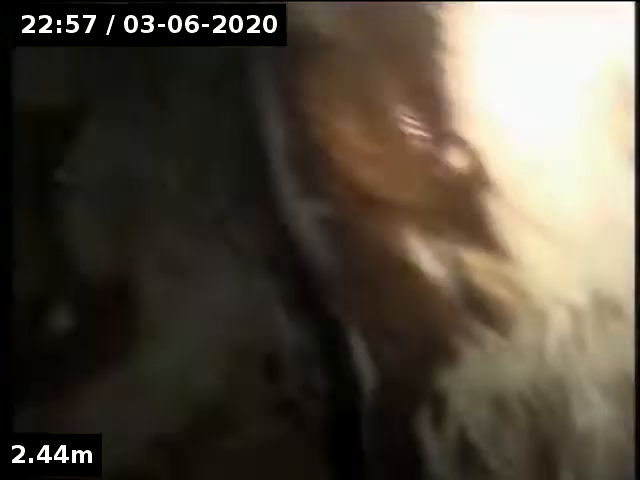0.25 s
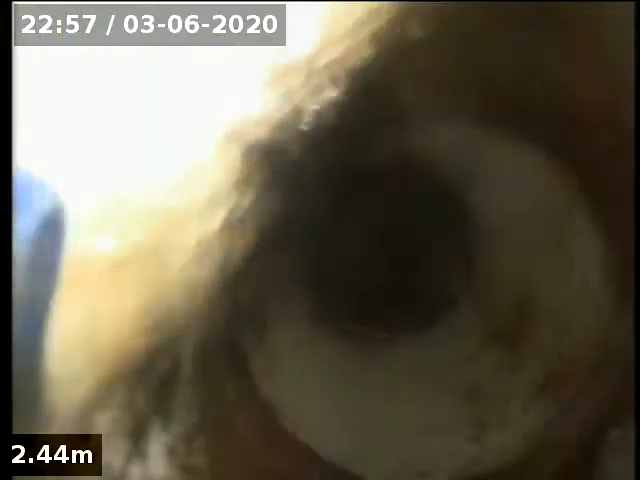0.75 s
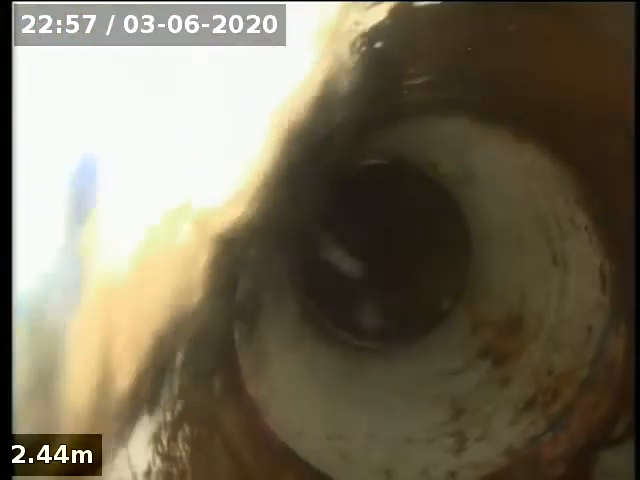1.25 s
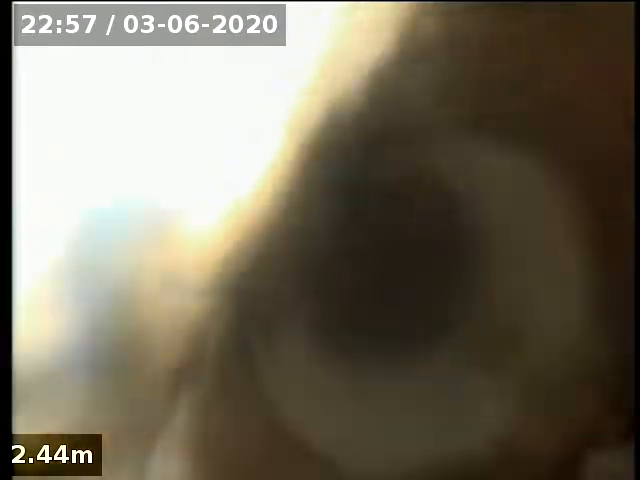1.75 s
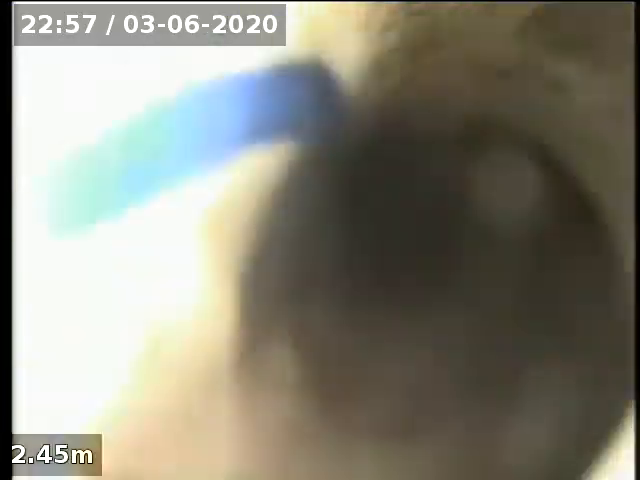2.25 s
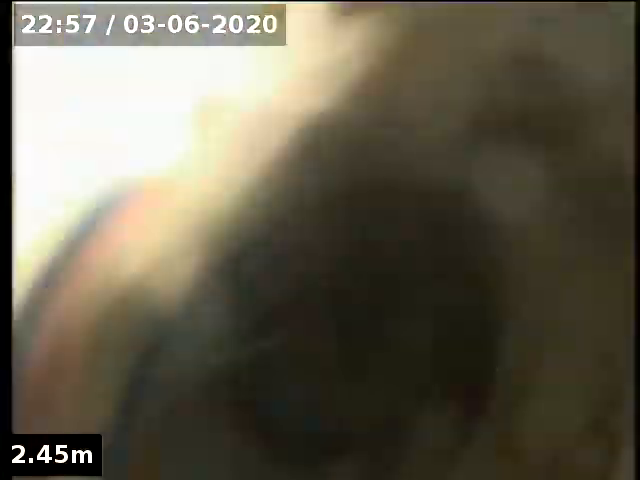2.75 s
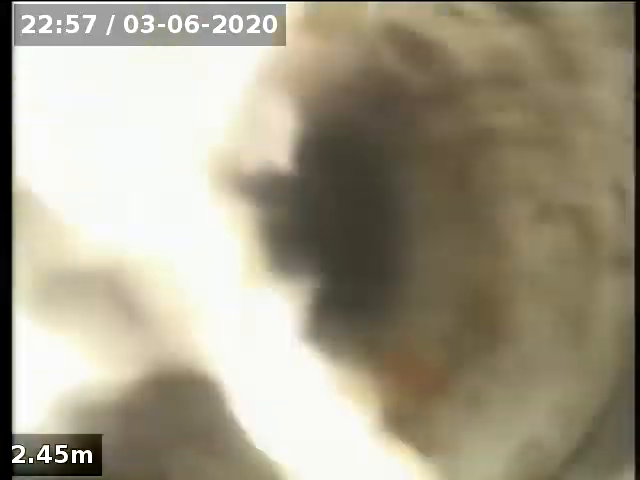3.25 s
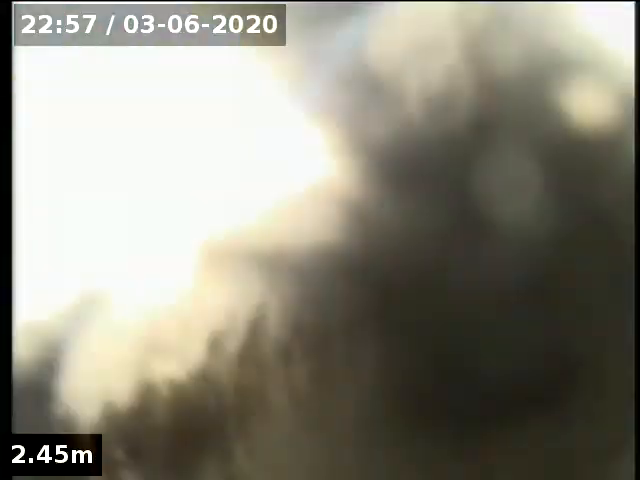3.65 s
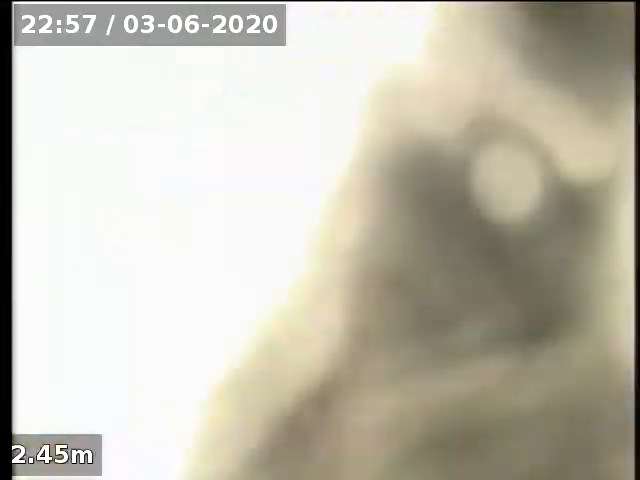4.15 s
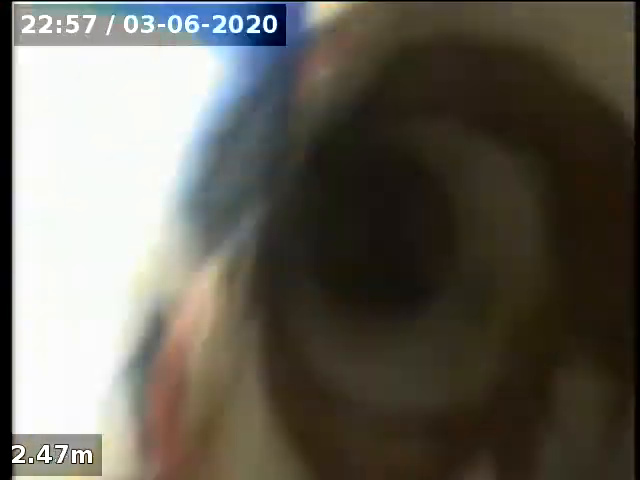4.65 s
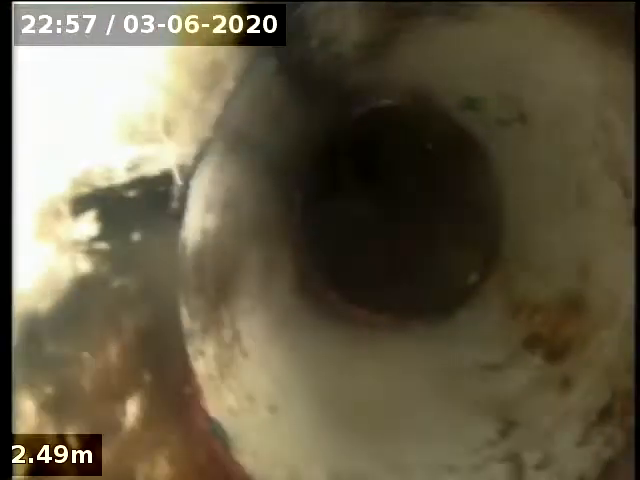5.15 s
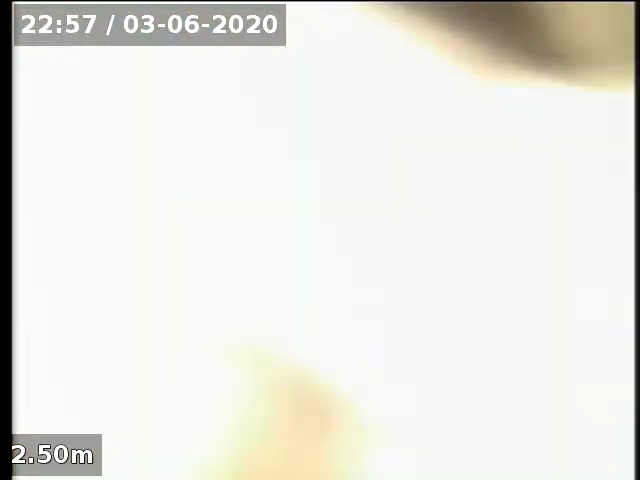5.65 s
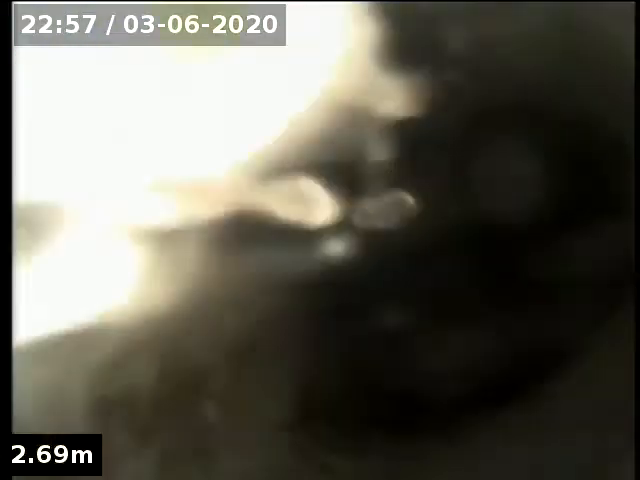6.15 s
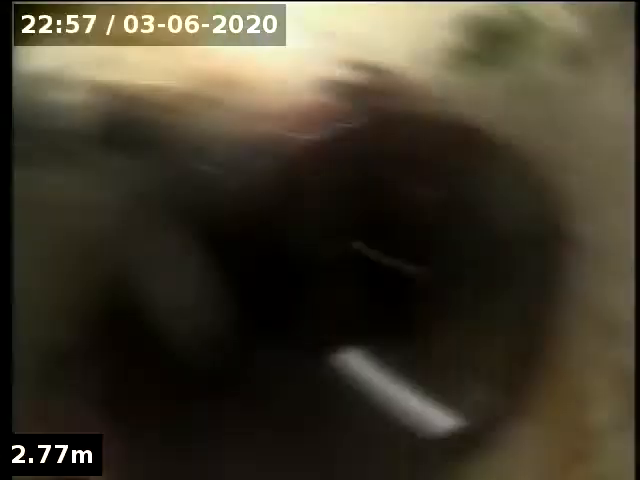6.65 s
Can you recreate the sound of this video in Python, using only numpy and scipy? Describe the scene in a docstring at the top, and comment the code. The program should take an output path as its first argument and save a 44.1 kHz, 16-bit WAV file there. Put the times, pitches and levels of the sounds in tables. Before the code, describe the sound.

Hard hollow clacks and gritty scraping come in uneven clusters as a push rod is worked along a pipe, heard close on a cheap microphone.

```python
"""A faint scrape comes first, then hard slaps in bursts: a stiff push rod is fed into a drain pipe
close beside a small recorder. Grit under the rod drives the pipe, stick and slip makes it squeal,
and each slap is a rattle of contacts that pipe and room answer. Soft hiss and hum lie behind.
The cheap microphone has a deep notch, overloads lopsidedly, and the sound drops out once."""
import sys
import numpy as np
from scipy import signal
from scipy.io import wavfile

SR = 44100
rng = np.random.default_rng(int(sys.argv[2]) if len(sys.argv) > 2 else 0)


def dump_mix(stems):
    """Bounce the given channels to the path in sys.argv[1] as a 16-bit WAV at rate SR."""
    frames = np.atleast_2d(stems).T  # one column per channel
    limited = np.clip(frames, -1, 1)  # hard clip at full scale
    pcm = np.round(limited * 32767).astype(np.int16)
    wavfile.write(sys.argv[1], SR, pcm)


N = 304290


def gain_of(db):
    """Turns decibels into an amplitude factor."""
    return 10 ** (np.asarray(db) / 20)


def evened(x):
    """Scales to rms 1."""
    return x / np.sqrt(np.mean(x ** 2) + 1e-20)


def peaked(x):
    """Scales to peak 1."""
    return x / np.abs(x).max()


def read(points, hz):
    """Reads a table of (f, value) on a log-frequency axis."""
    f, value = np.transpose(points)
    return np.interp(np.log(hz + 1), np.log(f + 1), value)


def coloured(x, points):
    """Causal minimum-phase filter with the gain curve given in dB."""
    hz = abs(np.fft.fftfreq(8192, 1 / SR))
    log_gain = np.log(gain_of(read(points, hz)))
    spectrum = np.exp(np.conj(signal.hilbert(log_gain)))
    taps = np.fft.ifft(spectrum).real[:4096]
    return signal.oaconvolve(x, taps)[:N]


def resonate(x, hz, width_hz):
    """Resonance of gain 1 at a fixed or moving pitch: shifts it to zero, smooths, shifts back."""
    turn = np.exp(2j * np.pi * np.cumsum(hz * np.ones(len(x))) / SR)
    r = np.exp(-np.pi * width_hz / SR)
    smoothed = signal.lfilter([1 - r], [1, -r], x / turn + 1e-18)
    return 2 * (turn * smoothed).real


def band(x, low_hz, high_hz):
    """Butterworth band-pass."""
    sos = signal.butter(2, [low_hz, high_hz], "bandpass", fs=SR, output="sos")
    return signal.sosfilt(sos, x)


def wander(per_s):
    """Chance curve of rms 1, with straight lines between per_s knots a second."""
    knots = np.arange(0, N / SR + 1, 1 / per_s)
    return evened(np.interp(np.arange(N) / SR, knots, rng.standard_normal(len(knots))))


def pipe(x):
    """Pipe and rod answer a drive with a sum of decaying modes."""
    # modes of pipe and rod: (f/Hz, level/dB relative to one another, t60/s)
    modes = [(240, -14.5, 0.11), (305, -2, 0.15), (380, -8.5, 0.27), (434, -5.5, 0.18),
             (526.2, -11.5, 0.24), (630, -5.5, 0.05), (702.3, 1.5, 0.071), (1060, -8.5, 0.23),
             (1132, -4.5, 0.18), (1250, 0, 0.062), (1520, -1, 0.007), (1620, 7, 0.025), (2050, -9.5, 0.18),
             (2340, 6, 0.011), (2810, -7, 0.095), (3100, 7.5, 0.011), (4720, 5, 0.0091),
             (6450, -2.5, 0.019)]
    t = np.arange(SR // 4) / SR
    ring = sum(gain_of(db - 60 * t / t60) * np.sin(2 * np.pi * hz * t) for hz, db, t60 in modes)
    return signal.oaconvolve(x, ring / np.linalg.norm(ring))[:N]


def room(paths):
    """Echoes off the room: a tail of sparse taps for each path, each band dying at its own speed."""
    # decay time of the room: (f/Hz, t60/s)
    decay = [(100, 0.12), (300, 0.2), (700, 0.31), (1800, 0.16), (4800, .2), (8000, 0.13)]
    taps = np.zeros((len(paths), SR // 2))
    at = np.arange(200, SR // 2 - 20, 20)
    at = at + rng.integers(0, 20, (len(paths), len(at)))  # one tap somewhere in every 20 samples
    np.put_along_axis(taps, at, rng.choice([-1., 1.], at.shape), 1)
    hz, t, z = signal.stft(taps, SR, nperseg=256)
    fade = gain_of(-60 * t / read(decay, hz)[:, None])
    tail = signal.istft(z * fade, SR, nperseg=256)[1]
    tail /= np.linalg.norm(tail, axis=1, keepdims=True)
    return signal.fftconvolve(paths, tail, axes=1)[:, :N].sum(0)


def air():
    """Still air and amplifier hiss are coloured noise; the faint wavering hum is narrow noise."""
    # level of the hiss, about which it wanders: (t/s, level/dB)
    hiss_level = [(0, -62.5), (.8, -60), (1.1, -62.5), (1.33, -63), (1.45, -60.5), (1.6, -62), (1.7, -61.5),
                  (5, -61.5), (5.2, -61), (6.9, -65)]
    # spectrum of the hiss, relative: (f/Hz, level/dB per Hz)
    hiss_colour = [(20, -16.5), (60, -4.5), (150, 0), (500, -2), (1000, -3.5), (2000, -9), (3200, -15.5),
                   (4600, -16.5), (6500, -6), (8400, -16)]
    # wavering tones: (f/Hz, level/dB)
    hum_tones = [(100.9, -81), (195.4, -82.5)]
    t = np.arange(N) / SR
    level_db = np.interp(t, *np.transpose(hiss_level)) + 0.97 * wander(24.0)
    noise = evened(coloured(rng.standard_normal(N), hiss_colour)) * gain_of(level_db)
    hum = sum(gain_of(db) * evened(resonate(rng.standard_normal(N), hz, 2.9)) for hz, db in hum_tones)
    return noise + hum


def squeals():
    """The rod squeals as it rubs: quick stick and slip holds one mode of it for a moment."""
    # squeals: (t/s, level/dB before the swell and its halving, first f/Hz, last f/Hz, length/s)
    squeal_rows = [(0.066, -44.5, 1140, 1200, 0.2), (0.447, -34.5, 1300, 1190, 0.018),
                   (2.6, -40, 1620, 1527, 0.08), (2.628, -41, 1165, 1060, .08),
                   (2.987, -33.5, 1484, 1390, 0.028), (3.157, -38, 1310, 1280, 0.024),
                   (3.812, -41, 1500, 1600, 0.075), (4.436, -40.5, 1120, 1250, 0.18),
                   (4.45, -40, 1630, 1760, 0.02), (5.689, -31, 1320, 1290, 0.013),
                   (5.764, -28, 1280, 1230, 0.019), (5.786, -23, 1360, 1320, 0.023),
                   (5.922, -25, 1360, 1350, 0.022), (6.237, -30, 1090, 1090, 0.023),
                   (6.334, -34.5, 1330, 1370, 0.05), (6.742, -39, 1020, 950, 0.051)]
    out = np.zeros(N)
    shakes = rng.standard_normal((len(squeal_rows), SR // 5))
    for shake, (s, db, first_hz, last_hz, length) in zip(shakes, squeal_rows):
        u = np.arange(round(length * SR)) / (length * SR)
        hz = first_hz + (last_hz - first_hz) * u
        tone = resonate(resonate(shake[:len(u)], hz, 170.), hz, 170.)
        swell = np.sin(np.pi * u ** 0.36) / 2  # quick rise, slow fall
        at = round(s * SR)
        out[at:at + len(u)] += gain_of(db) * evened(tone) * swell
    return out + gain_of(-12) * room(out[None])


def squeaks(grit, low_hz, high_hz, cycles):
    """Each grain of grit rings for a few cycles at one of 16 pitches."""
    which, t, out = rng.integers(0, 16, N), np.arange(1500) / SR, np.zeros(N)
    for k, hz in enumerate(np.geomspace(low_hz, high_hz, 16)):
        grain = np.sin(2 * np.pi * hz * t) * np.exp(-t * hz / cycles)
        rung = signal.oaconvolve(grit * (which == k), grain / np.linalg.norm(grain))[:N]
        out += gain_of(3.4 * wander(30.)) * rung
    return evened(out)


def scrape():
    """Grit catches and slips in uneven clumps under the rod and drives the pipe."""
    # level of the low rumble, about which it wanders: (t/s, level/dB)
    rumble_level = [(0, -67), (.17, -46), (.35, -55), (.6, -62), (.8, -74), (1.72, -84.5), (1.8, -60.5),
                    (1.98, -46.5), (2.1, -58.5), (2.5, -62), (2.72, -45.5), (3.2, -63.5), (3.39, -40.5),
                    (3.55, -63), (3.83, -49.5), (4.01, -37), (4.1, -50), (4.31, -54), (4.6, -49),
                    (4.76, -52), (4.95, -59.5), (5.1, -73.5), (5.5, -62.5), (5.87, -42), (6.2, -49),
                    (6.5, -51.5), (6.62, -54), (6.9, -46)]
    # rod sliding on the wall, one curve per spell of pushing: (t/s, level/dB without its hiss)
    slide_spells = [
        [(0.0, -79), (.11, -45.5), (.208, -33.5), (.26, -62), (.324, -48), (.36, -53), (.508, -44.5), (.6, -67),
         (.676, -58), (.8, -79)],
        [(1.73, -74), (1.892, -45.5), (1.98, -40.5), (2.078, -68), (2.232, -72), (2.348, -49.5), (2.42, -48),
         (2.51, -54), (2.56, -46), (2.646, -39), (2.718, -46.5), (2.83, -53)],
        [(2.93, -40), (2.97, -49), (3.08, -39), (3.18, -64), (3.29, -36.5), (3.34, -62), (3.51, -49),
         (3.56, -59), (3.67, -47), (3.8, -49), (3.86, -41), (3.92, -64), (4.01, -41), (4.12, -62.5),
         (4.24, -34), (4.31, -64.5), (4.43, -59.5), (4.61, -41), (4.68, -50), (4.79, -47.5), (4.95, -60.5)],
        [(5.28, -68), (5.454, -57), (5.5, -72), (5.722, -46.5), (5.82, -51), (5.97, -46.5), (6.11, -47.5),
         (6.182, -44), (6.254, -46), (6.438, -64), (6.5, -66), (6.62, -69), (6.768, -43.5), (6.818, -50),
         (6.9, -53)],
    ]
    # brief light brushes: (t/s, length/s, peak level/dB, brightest f/Hz, hiss level/dB relative to it)
    brush_rows = [(1.358, 0.31, -66.5, 2500, 3), (1.801, 0.067, -47, 1600, -15),
                  (2.033, 0.026, -50, 1520, -9), (2.154, 0.049, -41, 1530, -14),
                  (5.36, 0.11, -50, 2220, -6)]
    bright_hz, bright_drift = 1500, 0.16  # brightest band, rms of its drift as a share
    slide_hiss_db = -7  # relative to the scrape
    t, out = np.arange(N) / SR, np.zeros(N)

    # about 4000 catches a second, a few of them much harder
    force = gain_of(2.8 * np.minimum(rng.exponential(1, N), 5))
    grit = force * (rng.random(N) < 4000. / SR) * rng.choice([-1., 1.], N)
    grit = grit * gain_of(2.7 * wander(60.))
    rung = evened(pipe(grit))

    low = rung + 0.57 * evened(band(grit, 170.0, 640.0))
    rumble = evened(band(low, 150., 1300.0)) * gain_of(4.2 * wander(25.))
    hiss = evened(evened(band(grit, 3700.0, 7800.0)) + 0.95 * evened(band(rung, 3700.0, 7900.)))
    crunch = evened(band(rung, 1100.0, 3500.)) + squeaks(grit, 800., 3200., 3.3)
    drifting_hz = bright_hz * (1 + bright_drift * wander(10.0))
    bright = resonate(band(grit, 670.0, 3500.), drifting_hz, 280.0)
    slide = evened(crunch + 0.38 * evened(bright)) + gain_of(slide_hiss_db) * hiss

    out += gain_of(np.interp(t, *np.transpose(rumble_level))) * rumble
    for rows in slide_spells:
        s, db = np.transpose(rows)
        touching = np.clip(np.minimum(t - s[0], s[-1] - t) / 0.0071, 0, 1)  # 7.1 ms fades
        out += touching * gain_of(np.interp(t, s, db)) * slide
    for s, length, db, hz, hiss_db in brush_rows:
        stroke = np.sqrt(np.sin(np.pi * np.clip((t - s) / length, 0, 1)).clip(0))
        body = evened(crunch + 2.0 * evened(resonate(grit, hz, 700.)))
        out += stroke * gain_of(db) * (body + gain_of(hiss_db) * hiss)
    return out + gain_of(-19.0) * room(out[None])


def slaps():
    """Each slap is a brief rattle of contacts: a crack, a tick and a thud, then pipe and room ring."""
    # slaps of the rod: (t/s, blow level/dB, crack f/Hz, rattle length/s, tick level/dB, thud f/Hz,
    # thud level/dB, ring level/dB); the last three levels are relative to the blow
    slap_rows = [(.213, -24.5, 2050, 0.0082, -4.5, 506, -15, -12.5),
                 (.237, -2.5, 2300, 0.0048, -7.5, 103, -20.5, -13.5),
                 (.246, -10.5, 2140, 0.0053, -21, 236, -20.5, -11.5),
                 (.336, -34, 2310, 0.0045, -28, 320, -8, -6.5),
                 (.383, -5.5, 1140, 0.002, -50, 697, -22, -25),
                 (.455, -29, 1220, .0033, -25, 380, -28, -20),
                 (.541, -33, 1280, .0046, -22, 259, -7.5, -13.5),
                 (.573, -27.5, 1380, 0.0058, -36, 695, -30, -11),
                 (.619, -45.5, 1100, 0.0034, -19, 203, -9, -10), (.658, -43, 900, 0.0032, 0, 385, -29, 1),
                 (.719, -12, 1700, 0.0035, -11.5, 111.3, -23.5, -20),
                 (1.742, -40, 2250, 0.0036, -24.5, 252, -25.5, -23),
                 (1.805, -33.5, 1580, .0017, -25, 444, -20.5, -1),
                 (2.107, -39.5, 2130, 0.0037, -7, 390, -19, -2.5),
                 (2.186, -19, 2080, 0.0016, -25, 370, -28, -13),
                 (2.272, -5.5, 2200, 0.0045, -13, 127, -21.5, -17.5),
                 (2.461, -20.5, 1610, 0.0035, -39, 325, -20, -12.5),
                 (2.534, -34.5, 1950, .0024, -26, 667, -24, 4.5),
                 (2.556, -29, 1560, 0.0027, -16, 283, -34, -13),
                 (2.662, -26, 1510, 0.0034, -20, 316, -16, -20), (2.675, -25, 950, 0.002, -3, 549, -16, 0),
                 (2.74, -16, 1590, 0.0056, -38, 312, -15, -13),
                 (2.796, -20, 1410, 0.0033, -23, 445, -17.5, -14),
                 (3.035, -23, 1730, 0.0015, -5.5, 282, -32.5, -0.5),
                 (3.061, -17.5, 1320, 0.0017, -1, 603, -36, -16),
                 (3.091, -12, 1640, 0.0014, -30, 306, -29.5, -6),
                 (3.217, -17.5, 1700, .0026, -35, 520, -25, -11),
                 (3.28, -27.5, 1560, 0.0032, -23, 630, -20, -2),
                 (3.345, -17.5, 1060, 0.0035, -31, 257, -22, -9.5),
                 (3.386, -14.5, 1520, 0.0054, -6.5, 390, -14, -15),
                 (3.524, -30.5, 1310, 0.0056, -39, 382, -40, -16),
                 (3.578, -2.5, 2180, 0.0032, -6.5, 535, -21, -14),
                 (3.623, -26.5, 2020, 0.0055, -20, 304, -18.5, -8.5),
                 (3.73, -12.5, 1520, 0.0016, -15, 328, -24, -11),
                 (3.881, -23.5, 1540, 0.0032, -34, 560, -6, -23),
                 (3.94, -10, 1060, 0.0031, -8.5, 290, -16.5, -10),
                 (3.989, 0, 1350, 0.0039, -10.5, 437, -22, -14.5),
                 (4.04, -19.5, 1580, 0.0047, -17, 390, -12, -8),
                 (4.073, -29.5, 1280, 0.0046, -32, 378, -13, -13),
                 (4.149, -0.5, 1620, .0031, -6.5, 314, -26.5, -15.5),
                 (4.208, -22.5, 2360, 0.0062, -26, 647, -29, -9),
                 (4.23, -6.5, 1110, 0.0021, -25, 315, -21.5, -12.5),
                 (4.274, -22, 1640, 0.0024, -25, 410, -15.5, -15),
                 (4.291, -24, 1610, 0.0053, -13, 294, -17, -17),
                 (4.334, -37.5, 1430, 0.0045, -30, 264, -28, 0.5),
                 (4.491, -5.5, 1090, 0.0031, -11, 510, -22.5, -14.5),
                 (4.517, 0.5, 2200, 0.005, -7.5, 110, -21.5, -12),
                 (4.653, -32, 2060, 0.0038, -37, 650, -14.5, -9),
                 (4.706, -4.5, 1480, 0.0037, -6, 254, -20.5, -14),
                 (4.747, -19, 2090, 0.0027, -29, 248, -27, -4.5),
                 (5.319, -53.5, 1120, .0027, -23, 261, -1.5, -9.5),
                 (5.542, -21.5, 1520, 0.0018, -39, 640, -16, -15),
                 (5.6, -36.5, 1420, 0.0039, -36, 720, -9, -20),
                 (5.702, -6.5, 1620, 0.0026, -7, 195, -25, -14.5),
                 (5.716, -17, 2000, 0.0084, -28, 306, -16.5, -12),
                 (5.784, -31, 1290, .004, -40, 717, -11.5, -1.5),
                 (5.809, -26, 1290, 0.005, -39, 640, -9.5, -16),
                 (5.858, -4, 1240, 0.0047, -8, 397, -27, -15),
                 (5.875, -7, 2100, 0.0028, -19, 495, -16.5, -16),
                 (5.923, -18.5, 1440, 0.0046, -34, 247, -17.5, -12.5),
                 (5.969, -3.5, 1200, 0.0023, -10.5, 193, -26, -17),
                 (6.135, -15.5, 2250, 0.0023, -32, 263, -18.5, -3),
                 (6.256, -21, 993, .0028, -29, 437, -16, -10),
                 (6.304, -15, 1536, 0.0041, -33, 342, -16.5, -9),
                 (6.358, -25, 1300, 0.0045, -28, 380, -29, -18),
                 (6.476, -12, 1590, 0.003, -13, 380, -21.5, -17),
                 (6.542, -19.5, 1360, 0.0032, -27, 377, -22.5, -10),
                 (6.592, -5.5, 2100, 0.0055, -4.5, 240, -12.5, -12.5),
                 (6.654, -3.5, 980, 0.0035, -10.5, 550, -23, -14.5),
                 (6.783, -32.5, 993, 0.0039, -36, 436, -21, 5.5),
                 (6.81, -21, 1150, 0.0032, -36, 676, -9, -19),
                 (6.839, -5.5, 1900, 0.0071, -4, 210, -13.5, -14),
                 (6.891, -3, 1140, 0.0025, -20, 275, -12.5, -24)]
    # harder blows are drier: decay times at a soft and at a hard blow
    blow_db, crack_t60_s, thud_t60_s = (-30, 0), (.0048, 0.0014), (0.043, 0.019)
    t = np.arange(4000) / SR
    direct, paths = np.zeros(N + len(t)), np.zeros((3, N + len(t)))
    contacts = rng.standard_normal((len(slap_rows), len(t)))
    for k, (s, db, crack_hz, rattle_s, tick_db, thud_hz, thud_db, ring_db) in enumerate(slap_rows):
        crack_t60 = np.interp(db, blow_db, crack_t60_s)
        thud_t60 = np.interp(db, blow_db, thud_t60_s)
        # the contacts keep their force for a moment, then die out
        force = (1 - np.exp(-t / 0.00057)) * np.exp(-(t / rattle_s) ** 1.28)
        rattle = contacts[k] * force
        strength = 0.53 * np.sqrt(np.mean(force ** 2))

        ringing = resonate(rattle, crack_hz, 2.2 / crack_t60)
        crack = strength * evened(evened(ringing) + 0.21 * evened(band(rattle, 400.0, 3500.0)))
        tick = strength * evened(band(rattle, 3500.0, 7800.))
        thud_shape = (1 - np.exp(-t / 0.00043)) * gain_of(-60 * t / thud_t60)
        thud = peaked(np.sin(2 * np.pi * thud_hz * t) * thud_shape)
        sound = gain_of(db) * (crack + gain_of(tick_db) * tick + gain_of(thud_db) * thud)

        at = round(s * SR)
        direct[at:at + len(t)] += sound
        # spots on the wall have their own paths: the slaps take three in turn
        paths[k % 3, at:at + len(t)] += gain_of(ring_db) * sound
    return direct[:N] + gain_of(-3.0) * pipe(paths.sum(0)) + gain_of(3.0) * room(paths)


def scene():
    """Slaps, scraping and squeals over the still air, on one channel."""
    return (air() + squeals() + scrape() + slaps())[None]


def record(dry):
    """Notched microphone, lopsided overload, coarse sampling, one dropout, band limit."""
    # microphone colour with its deep notch: (f/Hz, level/dB)
    mic_colour = [(20, 6), (150, 3), (2800, 1.5), (3250, -2), (3450, -9), (3800, -15), (3930, -24.5),
                  (4000, -37), (4070, -25), (4250, -13), (4450, -6), (7300, -7), (7700, -9), (8400, 0)]
    # silent stretch: (from t/s, to t/s)
    dropout = (2.8245, 2.9358)
    sampling_hz, band_hz, edge_hz = 16000, 8860, 15800  # coarse sampling rate, two low-pass corners
    ceiling = .715  # of full scale
    t = np.arange(N) / SR
    x = coloured(dry[0], mic_colour)
    x = 0.57 * np.tanh(x / 0.55)
    x = x + 0.8 * x ** 2  # the preamplifier stretches peaks and squashes dips, which adds a thump
    x = signal.lfilter([1, -1], [1, -np.exp(-2 * np.pi * 4.2 / SR)], x)  # coupling capacitor, 4.2 Hz
    x = signal.oaconvolve(x, signal.firwin(101, sampling_hz / 2, fs=SR), "same")
    x = x * (1 + 2 * np.cos(2 * np.pi * sampling_hz * t))  # sampling mirrors the top of the band
    x = signal.oaconvolve(x, signal.firwin(61, 8100., fs=SR), "same")
    x = x * ((t < dropout[0]) | (t > dropout[1]))
    x = signal.oaconvolve(x, signal.firwin(511, band_hz, window=("kaiser", 9), fs=SR), "same")
    x = np.minimum(x, ceiling)  # the hardest peaks run out of range and snap
    return signal.oaconvolve(x, signal.firwin(511, edge_hz, window=("kaiser", 9), fs=SR), "same")[None]


dry = scene()
out = record(dry)
dump_mix(out)
```